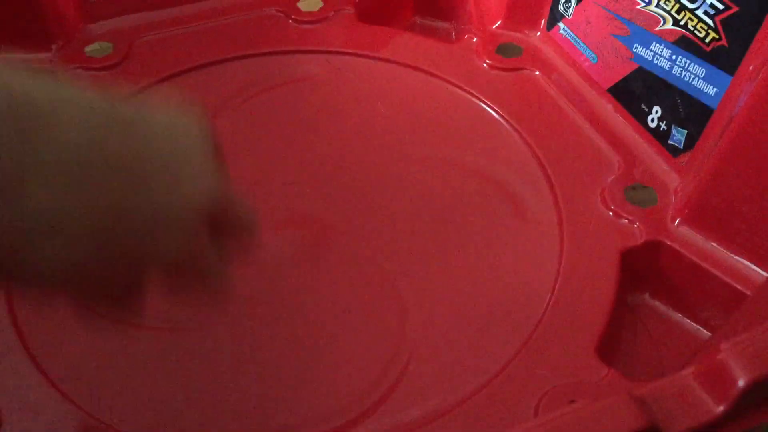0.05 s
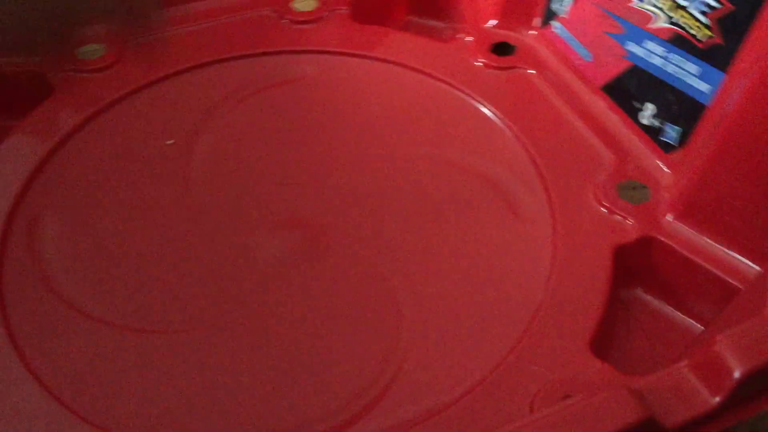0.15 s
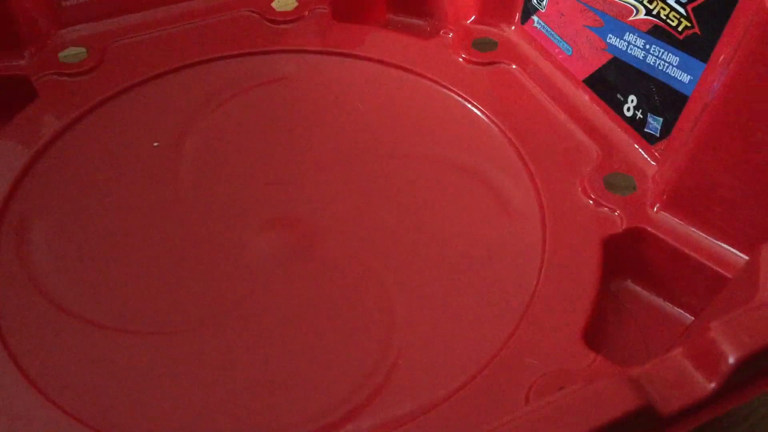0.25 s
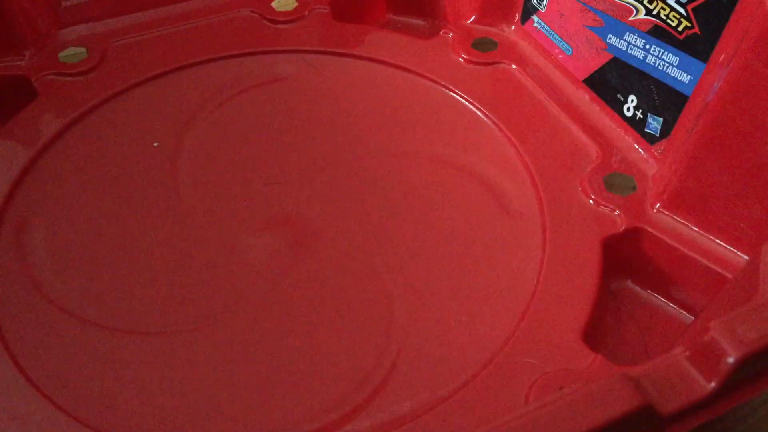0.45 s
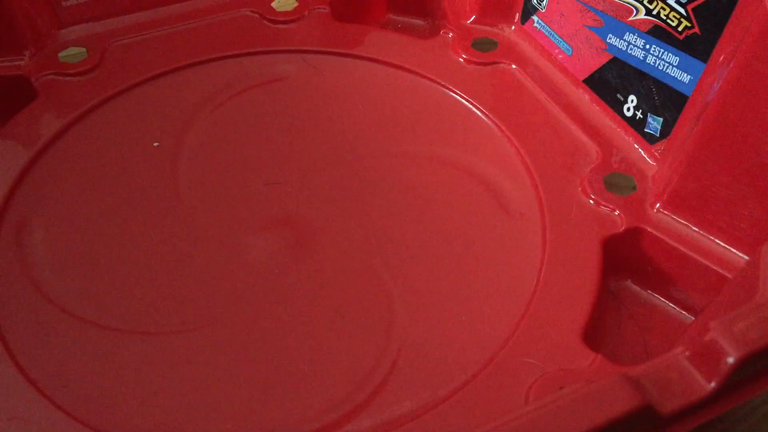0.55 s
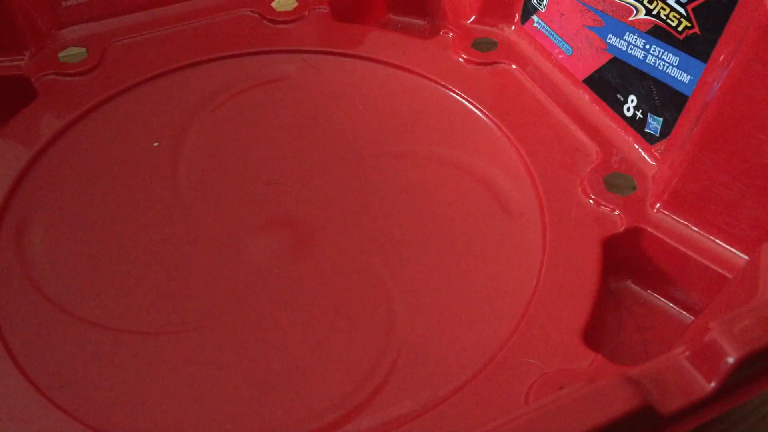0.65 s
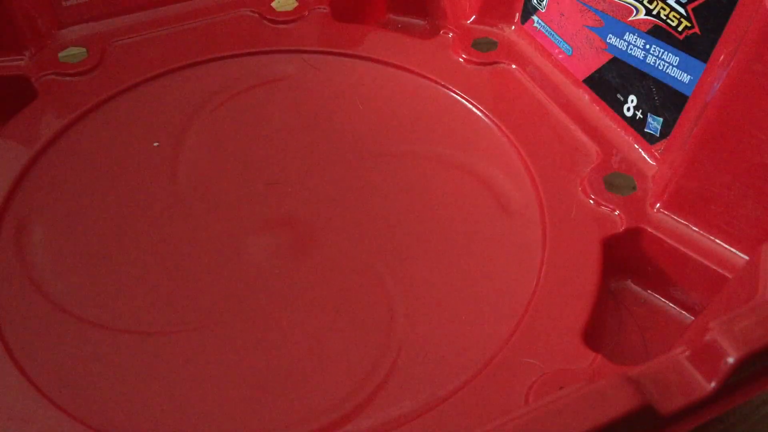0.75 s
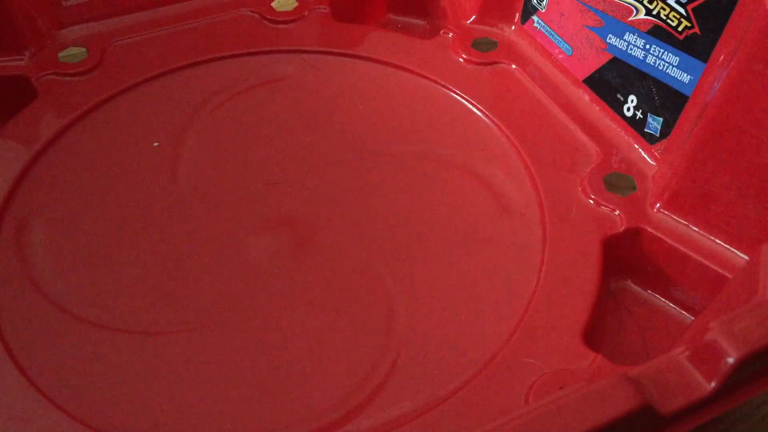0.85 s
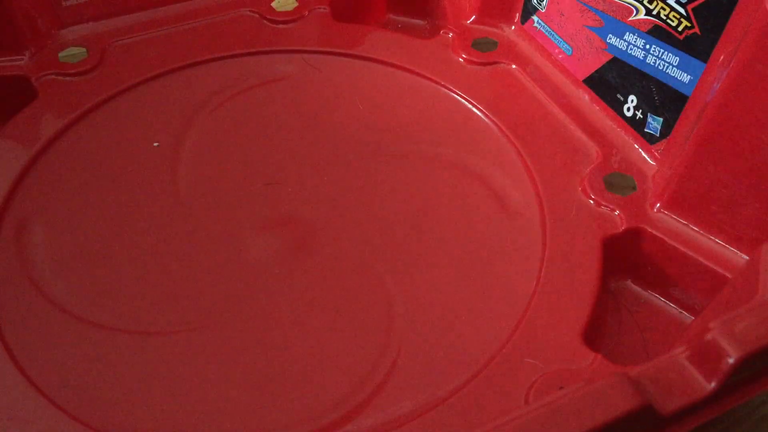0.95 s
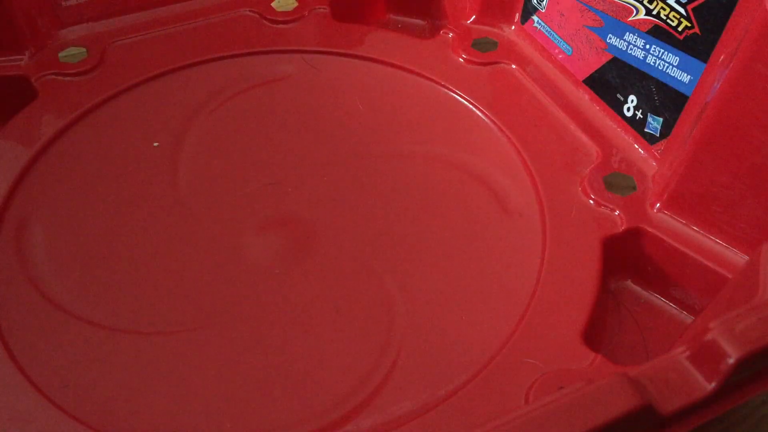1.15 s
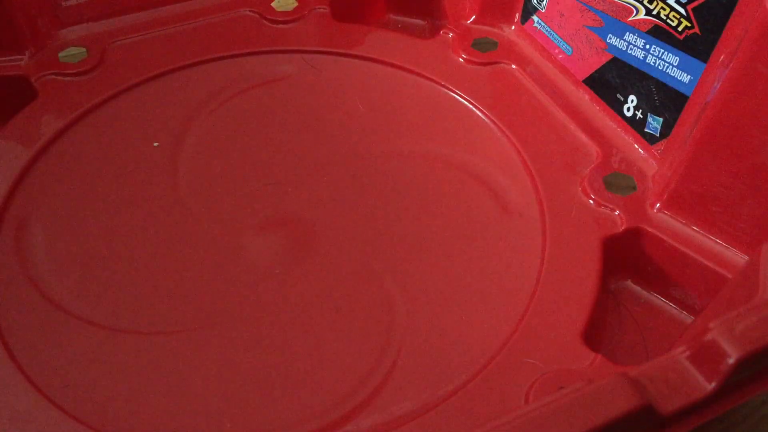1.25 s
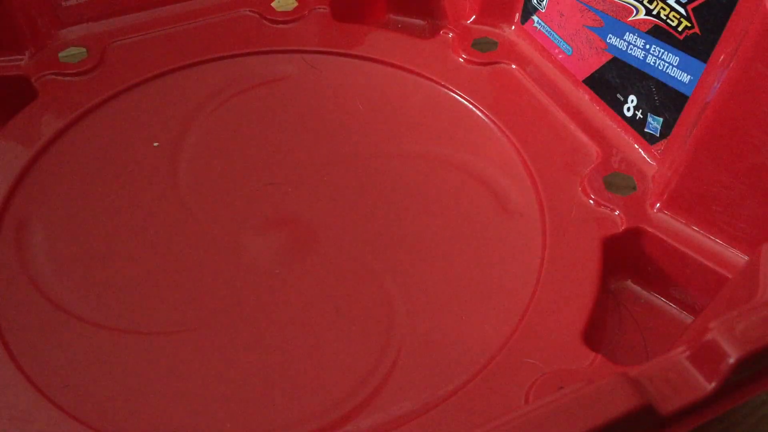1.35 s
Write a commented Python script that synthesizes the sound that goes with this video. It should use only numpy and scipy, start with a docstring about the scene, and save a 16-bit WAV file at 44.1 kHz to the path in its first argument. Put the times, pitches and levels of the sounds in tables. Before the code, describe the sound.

Toy spinning top scraped and snatched off a hollow plastic arena, then clicked into its launcher

```python
"""A hand scrapes a toy top across a plastic arena: slip noise through floor resonances, dull bumps, clacks.
Fingertips brush it and snatch it up: noise bursts clack, decaying sines ring its metal and boom the floor.
It rattles in the fingers as softer bursts over slip noise, then is clicked into its hollow launcher:
noise bursts with brief notes, then a last thin tick. A small room's noise tail answers; a faint rumble stays."""
import sys
import numpy as np
from scipy import signal
from scipy.fft import rfft, irfft
from scipy.io import wavfile
from scipy.ndimage import uniform_filter1d

SR = 44100
rng = np.random.default_rng(int(sys.argv[2]) if len(sys.argv) > 2 else 0)


def materialize(psi):
    """Save the field psi as 16-bit PCM at rate SR to the path in sys.argv[1].

    A 1-D psi becomes a single channel; in a 2-D psi each row is a channel.
    """
    bounded = np.clip(np.atleast_2d(psi).T, -1, 1)
    quanta = np.round(bounded * 32767).astype(np.int16)
    wavfile.write(sys.argv[1], SR, quanta)


N = 61739

# All levels are relative. Burst tilt acts above 2 kHz.
# Background rumble spectrum. Each row: frequency in Hz, level in dB.
RUMBLE_SPECTRUM = [(20, -19.5), (42, -8.5), (70, 4), (130, -8.5), (300, -20), (1000, -19.5), (3000, -30),
                   (8000, -34), (16000, -39)]
# Top dragged over the floor. Each row: time in seconds, level in dB.
DRAG_LEVEL = [(0, -47.5), (.025, -37.5), (.042, -44.5), (.049, -28), (.062, -34), (.072, -29), (.09, -28.5),
              (.103, -38.5), (.135, -37.5), (.165, -50.5), (.21, -58), (.25, -100)]
# Drag spectrum. Each row: frequency in Hz, level in dB.
DRAG_SPECTRUM = [(30, -13.5), (60, 5.5), (110, -17.5), (200, -19), (300, -7.5), (400, -4), (550, 0.5),
                 (850, -4.5), (1250, -2.5), (2000, -3), (3300, -15.5), (4200, -12.5), (5500, -22),
                 (7000, -17.5), (11000, -27.5), (15500, -27.5)]
# Arena resonances excited by the drag. Each row: frequency in Hz, width in Hz, lift in dB.
DRAG_RESONANCES = [(296, 31, 12), (479, 12, 9.5), (556, 48, 3.5), (797, 14, 9), (912, 180, 4),
                   (1190, 100, 9.5), (1263, 32, 3), (1355, 45, 5.5), (1624, 64, 2.5), (1850, 100, 1.5)]
# Dull handling bumps. Each row: time in seconds, level in dB.
HANDLING_LEVEL = [(0, -48), (.035, -41), (.06, -56.5), (.15, -53), (.19, -62.5), (.41, -47.5), (.47, -58.5),
                  (.56, -52.5), (.68, -69.5), (.78, -73), (.81, -58), (.875, -53), (.91, -71), (1, -82.5)]
# Handling spectrum. Each row: frequency in Hz, level in dB.
HANDLING_SPECTRUM = [(40, -24.5), (100, -15.5), (160, 2), (220, -5), (305, 1.5), (400, -4), (480, -14.5),
                     (1000, -19.5), (2500, -48.5)]
# Room decay. Each row: frequency in Hz, t60 in seconds.
ROOM_DECAY = [(80, 0.28), (300, .42), (800, .32), (2300, 0.29), (5000, 0.3), (9000, 0.22), (15000, 0.22)]
# Room tail spectrum. Each row: frequency in Hz, level in dB.
ROOM_LEVEL = [(80, -13), (300, -11.5), (700, -14.5), (1500, -10), (2400, -11.5), (4500, -9.5), (7000, -12),
              (14000, -14)]
# Clacks of the top's loose parts. Each row: start in seconds, level in dB, tilt in dB per octave,
# hold in seconds, share of the metal ring in dB.
CLACK_EVENTS = [(0.027, -40, -2, .003, -2), (0.055, -33.5, -5, .003, -14), (0.14, -48.5, -3.5, 0.0015, -19),
                (0.2148, -16.5, 0.5, 0.0051, 0), (0.262, -16, -0.5, 0.0051, -20.5),
                (0.291, -24.5, 1.5, 0.0037, -23), (0.3170, -36, -1, .004, -11),
                (0.361, -42, -4, 0.0056, -14.5)]
# Clack spectrum. Each row: frequency in Hz, level in dB.
CLACK_SPECTRUM = [(200, -4), (900, -13.5), (1400, -8), (2050, 4.5), (3000, -1.5), (3700, 1), (5100, -6),
                  (6300, -1), (7700, -7), (9100, 1), (10000, -9), (11600, -3.5), (14000, -6.5),
                  (16000, -15.5)]
# Short resonances of the top's shell. Each row: frequency in Hz, width in Hz, lift in dB.
TOP_RESONANCES = [(2160, 200, -1.5), (2776, 180, 6.5), (3780, 87, 3), (4540, 220, 6), (5390, 180, 8),
                  (6150, 320, 4.5), (6650, 87, 6), (7300, 200, 5.5), (8050, 270, 6.5), (8900, 210, 4.5),
                  (10960, 67, 5.5), (11680, 62, 5), (11500, 480, 2.5), (13800, 220, 5.5), (14850, 220, 4.5)]
# Modes of the top's metal ring. Each row: frequency in Hz, level in dB, t60 in seconds.
METAL_MODES = [(4904, -24.5, 0.45), (6132, -29.5, .25), (8129, -20, 0.15), (8850, -22.5, .13),
               (11530, -13, .24), (12400, -19.5, .45)]
# Fingertips brushing the top. Each row: time in seconds, level in dB.
BRUSH_LEVEL = [(.16, -91.5), (.18, -55.5), (.197, -48), (.212, -60.5), (.23, -100)]
# Brush spectrum. Each row: frequency in Hz, level in dB.
BRUSH_SPECTRUM = [(800, -20.5), (2700, 8), (4200, -14), (6500, -0.5), (7600, -8), (9000, -4),
                  (13000, -15.5), (16000, -23.5)]
# Blows on the arena floor. Each row: start in seconds, level in dB, mode tilt in dB per octave above 250 Hz.
FLOOR_BLOWS = [(0.2153, -8.5, -10.5), (0.2621, 1, 0.5)]
# Modes of the arena floor. Each row: frequency in Hz, level in dB, t60 in seconds, delay in seconds.
FLOOR_MODES = [(60, -34.5, .5, .003), (104, -25, .4, .003), (152, -24.5, .33, 0.019), (203.8, -24, .2, 0),
               (235.3, -11, .15, .009), (286, -9, 0.066, 0.025), (353.5, -6.5, 0.092, .005),
               (419, -22.5, 0.16, .004), (550, 7.5, 0.057, .005), (559.2, 0, .04, .003),
               (689, 3, 0.058, 0.011), (707, -21.5, .2, .005), (913.5, 4.5, .04, 0.00082),
               (920, 0.5, 0.041, 0.00086), (1033, -15.5, .14, 0.0011), (1074, -21, 0.19, .002),
               (1141, -12.5, .11, .002), (1267, -13, .11, .002), (1321, -17, .12, .002),
               (1694, -12, 0.086, 0)]
# Dense weaker modes of the arena, as a spectrum. Each row: frequency in Hz, level in dB.
DENSE_SPECTRUM = [(25, -30), (80, -17.5), (250, 8), (450, -0.5), (700, -3.5), (1100, -2.5), (1480, -9),
                  (1720, -8), (2500, -14), (5000, -50)]
# Top shifting in the fingers. Each row: time in seconds, level in dB.
FUMBLE_LEVEL = [(.33, -62.5), (.40, -50), (.47, -56.5), (.51, -52.5), (.565, -51.5), (.6, -76), (.72, -69),
                (.79, -77), (.84, -55.5), (.89, -64), (.92, -80)]
# Fumble spectrum. Each row: frequency in Hz, level in dB.
FUMBLE_SPECTRUM = [(200, -9.5), (550, -0.5), (1000, 1), (1350, -7.5), (2400, 2), (3000, -18), (3800, -4.5),
                   (4900, -26), (12000, -25), (15500, -34)]
# Faint rattles in the fingers. Each row: start in seconds, level in dB, tilt in dB per octave, hold in seconds.
RATTLE_EVENTS = [(0.4087, -40.5, -1, .002), (0.432, -48.5, 0.5, 0.0036), (0.4398, -43, 1.5, 0.0081),
                 (0.4988, -44.5, -1, 0.0019), (0.5085, -42, -1, .003), (0.5270, -48.5, -3, 0.0061),
                 (0.541, -60, 2, .004), (0.5737, -44, -14, 0.00202), (0.66, -70, -10, 0.0035),
                 (0.685, -61, 2.5, 0.0054)]
# Rattle spectrum. Each row: frequency in Hz, level in dB.
RATTLE_SPECTRUM = [(300, -22), (1300, -4), (1900, 3.5), (2450, 6), (3050, -16.5), (3850, 5.5),
                   (4900, -17.5), (6300, -15.5), (8000, -17.5), (12000, -15.5), (15500, -31)]
# Launcher clicks. Each row: start in seconds, level in dB, tilt in dB per octave, hold in seconds.
CLICK_EVENTS = [(0.7326, -35, -10, 0.0031), (0.8131, -56, 0, 0.0031), (0.8243, -40.5, -6, 0.0047),
                (0.838, -47, -6.5, .004), (0.9069, -34, 0, 0.0047), (0.916, -36.5, 14, 0.0044),
                (0.9200, -17, 0, .003), (0.926, -30, -1, .003), (0.9390, -36, -5, 0.0018),
                (0.945, -32.5, -6, 0.0044), (0.984, -31.5, -8, .003), (0.9913, -38, 0.5, 0.0083),
                (1.0163, -48.5, 5.5, 0.0054), (1.0298, -16.5, 1, 0.0053), (1.04, -40, -8, 0.0069),
                (1.0660, -46, -4, 0.0055), (1.077, -42.5, 2.5, 0.0084), (1.0947, -41, -3, 0.0053),
                (1.125, -49, 3.5, 0.012)]
# Launcher's hollow body. Each row: frequency in Hz, level in dB.
LAUNCHER_SPECTRUM = [(450, -43.5), (850, -16.5), (1500, -10.5), (1900, 1), (2190, 5), (2370, 0),
                     (2620, 7.5), (3100, -17), (3600, -5), (4200, -13), (5300, -15.5), (6600, -11.5),
                     (7300, -13.5), (8300, -17), (11200, -20.5), (13000, -23), (16000, -27.5)]
# Short resonances of the launcher's shell. Each row: frequency in Hz, width in Hz, lift in dB.
LAUNCHER_RESONANCES = [(1970, 100, 1.5), (2185, 51, 5.5), (2520, 280, 5), (2854, 90, 9), (3590, 120, 9),
                       (3975, 120, 5.5), (4513, 160, -6), (5810, 260, 4.5), (6380, 88, 9), (6770, 540, 10),
                       (7380, 400, 7.5), (7950, 160, 6), (9320, 200, 7), (11170, 350, 12),
                       (12100, 250, 11.5), (13350, 200, 7), (14000, 200, 8)]
# Modes of the launcher's hollow grip. Each row: frequency in Hz, level in dB, t60 in seconds.
GRIP_MODES = [(2205, -11, .025), (2570, -2.5, 0.082), (3584, -10, 0.018)]
# Last, thinner tick. One row: start in seconds, level in dB, hold in seconds.
LATCH_EVENT = (1.2112, -46.5, 0.0023)
# Latch spectrum. Each row: frequency in Hz, level in dB.
LATCH_SPECTRUM = [(600, -23), (1600, -11.5), (1950, 7), (2400, -5), (3200, -9), (3880, 1.5), (4600, -13),
                  (5800, 2), (6900, -21), (10200, -18), (12600, -8.5), (15500, -19)]
# Flat spectrum. Each row: frequency in Hz, level in dB.
FLAT_SPECTRUM = [(20, 0), (20000, 0)]

RUMBLE_DB = -64.5
CLACK_T60_S, CLICK_T60_S, BURST_RISE_S = 0.018, 0.022, 0.00064
METAL_DB, RATTLE_METAL_DB = -2, -12
GRASP_S, GRASP_DB_PER_S = 0.55, 400  # fingers close on the metal ring and damp it
FLOOR_MODES_DB, FLOOR_SWELL_S = -9.5, 0.0051
DENSE_DB, DENSE_T60_S, DENSE_HOLD_S = -20.5, 0.15, 0.0088
ROOM_GAP_S = 0.007
CUTOFF_HZ = 16150


def amp(db):
    """Decibels to gain."""
    return 10 ** (np.asarray(db) / 20)


def evened(x):
    """Scales to rms 1."""
    return x / np.sqrt(np.mean(x ** 2) + 1e-20)


def read(points, hz):
    """Interpolates a table on a log-frequency axis."""
    table_hz, value = np.transpose(points)
    return np.interp(np.log(hz + 1), np.log(table_hz + 1), value)


def add(mix, start_s, sound):
    """Mixes a sound in at start_s, cut at the end of the mix."""
    part = mix[round(start_s * SR):][:len(sound)]
    part += sound[:len(part)]


def colour(x, spectrum, tilt_db=0, resonances=(), size=4096):
    """Minimum-phase filter of unit energy: broad spectrum, tilt above 2 kHz, resonances."""
    hz = np.fft.rfftfreq(size, 1 / SR)
    octaves = np.log2(np.maximum(hz, 2000) / 2000)
    lift_db = sum(db / (1 + (2 * (hz - centre) / width) ** 2) for centre, width, db in resonances)
    gain = amp(read(spectrum, hz) + tilt_db * octaves + lift_db)
    # Folding the cepstrum makes the filter causal.
    cepstrum = irfft(np.log(gain))
    cepstrum[1:size // 2] *= 2
    cepstrum[size // 2 + 1:] = 0
    taps = irfft(np.exp(rfft(cepstrum)))
    return signal.fftconvolve(x, taps / np.linalg.norm(taps))[:len(x)]


def chatter(hold_s, t60_s, size=8192):
    """Burst of tiny contacts, fairly even in spectrum: rises, holds, then dies."""
    t = np.arange(size) / SR
    rise = np.minimum(t / BURST_RISE_S, 1)
    envelope = rise * amp(-60 * np.maximum(t - hold_s, 0) / t60_s)
    noise = rng.standard_normal(size) * envelope
    flat = irfft(np.exp(1j * np.angle(rfft(noise))))  # phase only
    local_rms = np.sqrt(abs(uniform_filter1d(flat ** 2, size=64)) + 1e-20)
    return flat / local_rms * envelope


def bursts(events, spectrum, t60_s):
    """Contact bursts, each tilted and coloured by the struck body."""
    out = np.zeros(N)
    for start_s, db, tilt_db, hold_s in events:
        add(out, start_s, amp(db) * colour(chatter(hold_s, t60_s), spectrum, tilt_db))
    return out


def ring(hz, db, t60_s, rise_s):
    """One mode: a sine that swells and dies."""
    t = np.arange(SR) / SR
    swell = 1 - np.exp(-t / rise_s)
    return amp(db - 60 * t / t60_s) * np.sin(2 * np.pi * hz * t) * swell


def rub(level, spectrum, slips_per_s, spread_db, hiss, resonances=()):
    """Friction: tiny slips of uneven size over a smooth hiss, through a body."""
    slipping = rng.random(N) < slips_per_s / SR
    sign = rng.choice([-1, 1], N)
    size = amp(spread_db * np.minimum(rng.exponential(1, N), 4))
    slips = evened(slipping * sign * size)
    drive = evened(slips + hiss * rng.standard_normal(N))
    level_db = np.interp(np.arange(N) / SR, *np.transpose(level))
    return colour(drive * amp(level_db), spectrum, resonances=resonances)


def rumble():
    """Steady, mostly low background noise."""
    return amp(RUMBLE_DB) * colour(rng.standard_normal(N), RUMBLE_SPECTRUM)


def drag():
    """The top's slips over the floor excite arena resonances."""
    return rub(DRAG_LEVEL, DRAG_SPECTRUM, 2700, spread_db=2.0, hiss=0.46, resonances=DRAG_RESONANCES)


def handling():
    """Dull bumps: sparse slips and hiss through a low spectrum."""
    return rub(HANDLING_LEVEL, HANDLING_SPECTRUM, 260, spread_db=0.5, hiss=0.99)


def room(x):
    """Diffuse noise tail, each band dying at its own speed."""
    hz, t, bands = signal.stft(rng.standard_normal(SR), SR, nperseg=256)
    t60_s = read(ROOM_DECAY, hz)[:, None]
    decay = amp(read(ROOM_LEVEL, hz)[:, None] - 60 * t / t60_s)
    energy_norm = np.sqrt(2 * np.log(1000) / (t60_s * SR))  # level independent of t60
    tail = signal.istft(bands * decay * energy_norm, SR, nperseg=256)[1]
    wet = np.zeros(N)
    add(wet, ROOM_GAP_S, signal.fftconvolve(x, tail))
    return wet


def clacks():
    """The top's loose parts clack together."""
    return bursts([row[:4] for row in CLACK_EVENTS], CLACK_SPECTRUM, CLACK_T60_S)


def metal():
    """Clacks set the metal ring singing, rattles keep it alive, the grasp damps it."""
    out = np.zeros(N)
    tone = sum(ring(*mode, rise_s=.001) for mode in METAL_MODES)
    for start_s, db, _, _, share_db in CLACK_EVENTS:
        add(out, start_s, amp(db + METAL_DB + share_db) * tone)
    for start_s, db, tilt_db, _ in RATTLE_EVENTS:
        # A brighter rattle rings more.
        add(out, start_s, amp(db + RATTLE_METAL_DB + 2 * tilt_db) * tone)
    grasped_s = np.maximum(np.arange(N) / SR - GRASP_S, 0)
    return out * amp(-GRASP_DB_PER_S * grasped_s)


def brush():
    """Fingertip friction on the top as they close on it."""
    return rub(BRUSH_LEVEL, BRUSH_SPECTRUM, 1300, spread_db=3.5, hiss=1)


def arena():
    """The thin floor booms in delayed modes; the softer blow wakes mainly the low ones."""
    out = np.zeros(N)
    for start_s, db, tilt_db in FLOOR_BLOWS:
        for hz, mode_db, t60_s, delay_s in FLOOR_MODES:
            level_db = db + FLOOR_MODES_DB + mode_db + tilt_db * np.log2(max(hz / 250, 1))
            add(out, start_s + delay_s, ring(hz, level_db, t60_s, FLOOR_SWELL_S))
        dense = colour(chatter(DENSE_HOLD_S, DENSE_T60_S), DENSE_SPECTRUM)
        add(out, start_s, amp(db + DENSE_DB) * dense)
    return out


def fumble():
    """Friction of the top shifting in the fingers."""
    return rub(FUMBLE_LEVEL, FUMBLE_SPECTRUM, 1100, spread_db=6, hiss=0.98)


def rattles():
    """The loose parts rattle softly in the fingers."""
    return bursts(RATTLE_EVENTS, RATTLE_SPECTRUM, CLACK_T60_S)


def launcher():
    """Catches slip and snap home in a hollow plastic body; the latch settles with a last tick."""
    out = bursts(CLICK_EVENTS, LAUNCHER_SPECTRUM, CLICK_T60_S)
    start_s, db, hold_s = LATCH_EVENT
    add(out, start_s, amp(db) * colour(chatter(hold_s, CLICK_T60_S), LATCH_SPECTRUM))
    return out


def grip():
    """Each click rings a brief hollow note in the launcher's grip."""
    out = np.zeros(N)
    tone = sum(ring(*mode, rise_s=0.000603) for mode in GRIP_MODES)
    for start_s, db, _, _ in CLICK_EVENTS:
        add(out, start_s, amp(db) * tone)
    return out


def scene():
    """Shells beam their resonances at the microphone; the room hears their average over all directions."""
    friction = drag() + handling() + brush() + fumble()
    ringing = metal() + arena() + grip()
    top_hits = clacks() + rattles()
    clicks = launcher()
    beamed_top = colour(top_hits, FLAT_SPECTRUM, resonances=TOP_RESONANCES)
    beamed_launcher = colour(clicks, FLAT_SPECTRUM, resonances=LAUNCHER_RESONANCES)
    direct = friction + ringing + beamed_top + beamed_launcher
    wet = room(friction + ringing + top_hits + clicks)
    return (direct + wet + rumble())[None]


def record(dry):
    """The recorder's band limit: a linear-phase low-pass."""
    taps = signal.firwin(255, CUTOFF_HZ, window=("kaiser", 9), fs=SR)
    return signal.oaconvolve(dry, taps[None], "same")


dry = scene()
out = record(dry)
materialize(out)
```